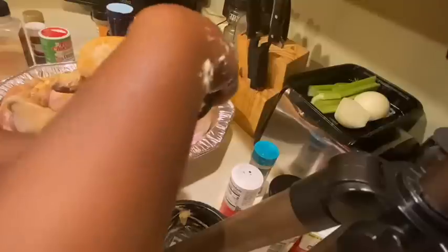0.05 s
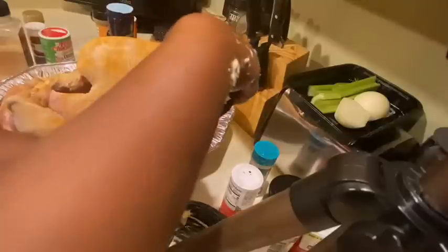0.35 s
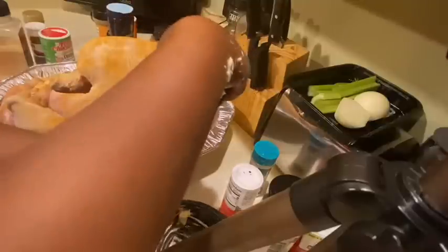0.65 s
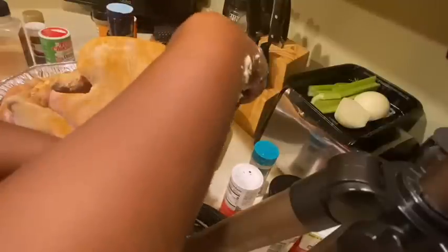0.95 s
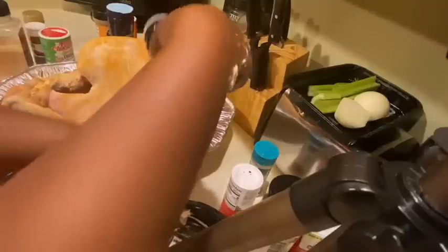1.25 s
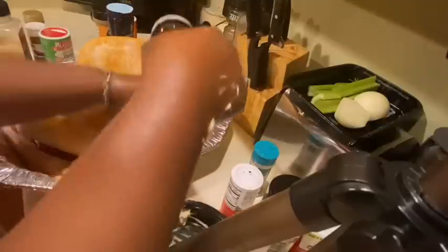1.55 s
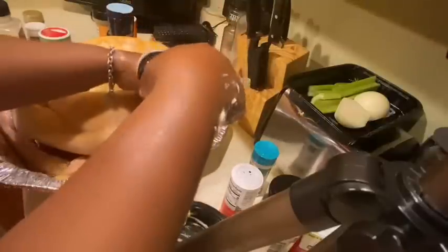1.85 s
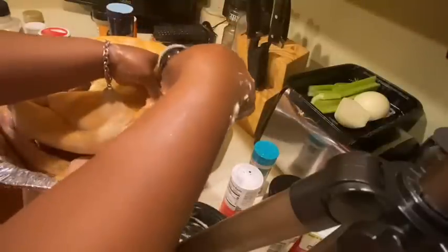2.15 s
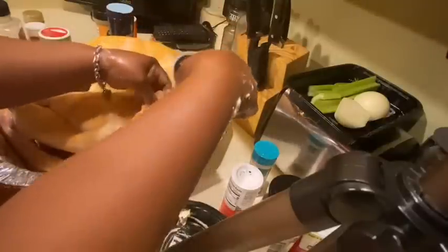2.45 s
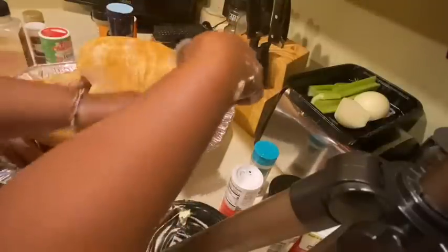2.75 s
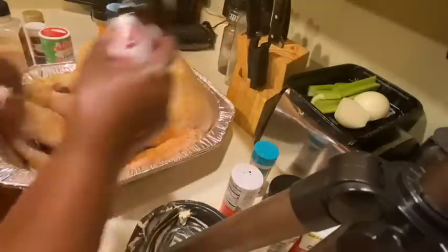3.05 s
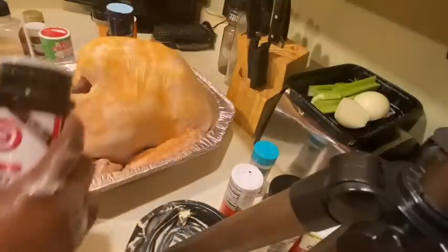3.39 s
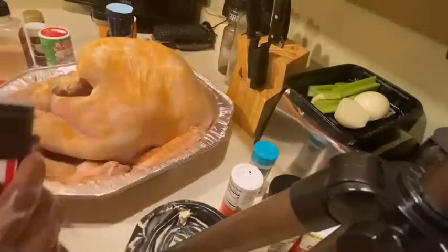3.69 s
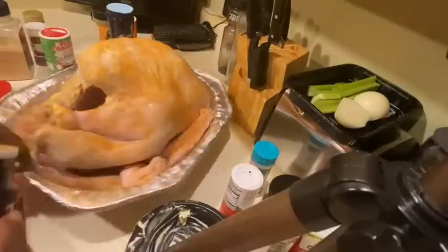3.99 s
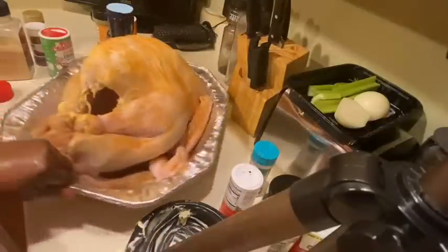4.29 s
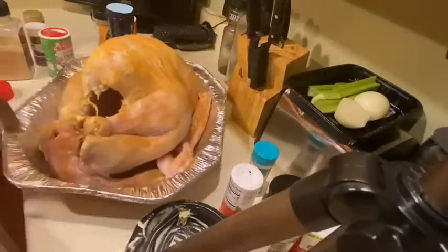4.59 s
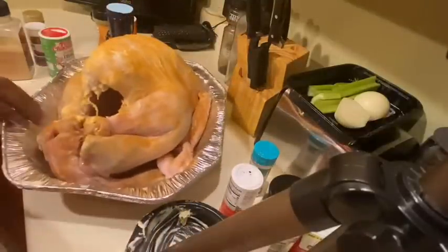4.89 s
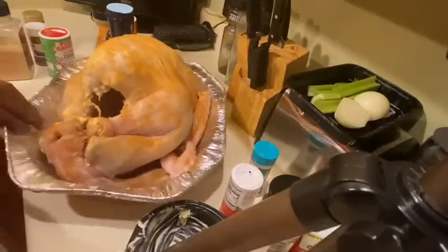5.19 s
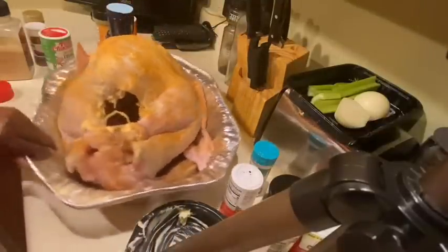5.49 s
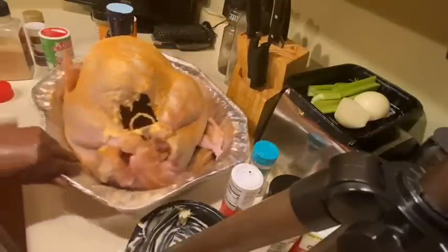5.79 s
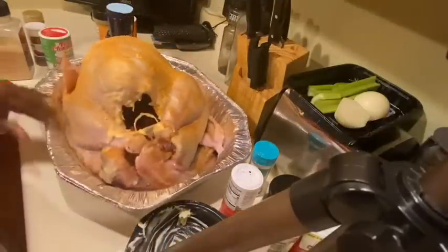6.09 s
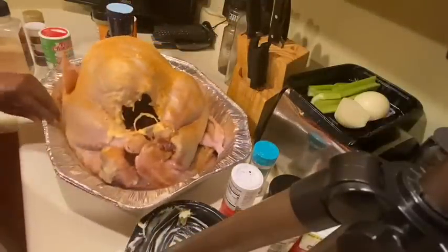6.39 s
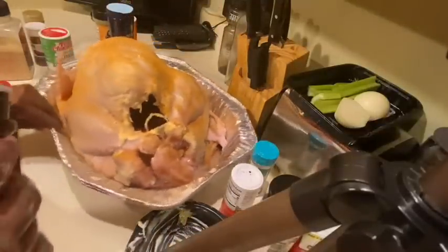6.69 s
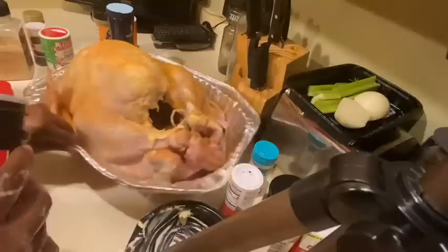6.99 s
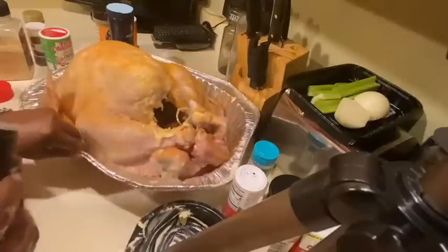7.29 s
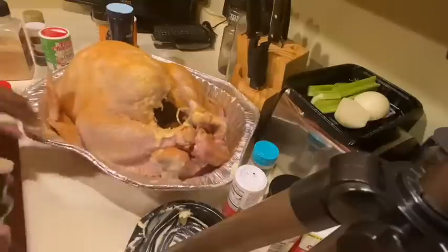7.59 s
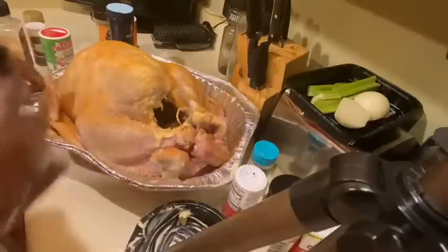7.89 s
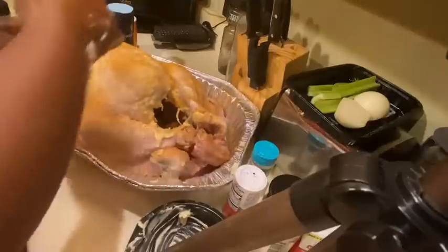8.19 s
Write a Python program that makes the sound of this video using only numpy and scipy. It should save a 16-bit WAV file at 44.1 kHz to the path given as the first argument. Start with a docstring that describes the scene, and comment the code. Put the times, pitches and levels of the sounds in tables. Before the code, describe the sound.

An appliance drones quietly to the right in a small kitchen. Close by, something clinks, and hands smear butter over a raw turkey with faint, moist, clicking strokes. Next the loaded foil pan is dragged round in short pushes: its thin base pops loudly as it buckles, scrapes and crinkles, then knocks on the worktop. The drone sinks for a moment at the end.

```python
"""A light bump and a clink, then buttery hands rub a raw turkey in a foil pan with a wet hiss.
The hiss is countless tiny clicks of tearing butter. Next the pan is turned round on the kitchen
counter: its thin base scrapes as it catches and slips, pops as it buckles and crinkles as creases
give way, and the loaded pan bumps the worktop. All along, an appliance hums to the right in the
small room; its drone sinks briefly near the end."""
import sys
import numpy as np
from scipy import signal
from scipy.fft import rfft, irfft
from scipy.io import wavfile

SR = 44100
rng = np.random.default_rng(int(sys.argv[2]) if len(sys.argv) > 2 else 0)


def output_pcm(signal):
    """Save a mono or channel-first signal as 16-bit PCM at the path in sys.argv[1].

    Samples are clipped to [-1, 1] before scaling.
    """
    pcm = np.clip(np.atleast_2d(signal).T, -1, 1) * 32767
    wavfile.write(sys.argv[1], SR, np.round(pcm).astype(np.int16))


N = 372644
T = np.arange(N) / SR

# Levels in the tables are relative: the functions turn them up or down. Hz tells the pitch.
# The tone of each noise, from bass to treble. Each row: frequency in Hz, level in dB.
AIR_TONE = [(100, -26), (900, 6.5), (1600, -3.5), (3000, -17.5), (6000, -21), (15000, -25.5)]
FAN_TONE = [(22, -46.5), (32, -21.5), (42, -5.5), (56, -0.5), (76, -5), (100, -2.5), (155, 1.5), (200, -7),
            (330, -5), (540, -10), (750, -25.5), (1050, -21.5), (1700, -43), (3300, -58.5)]
RIM_TONE = [(1500, -33), (2700, -19), (3300, 4), (3700, -5), (4600, -6.5), (9000, -7.5)]
THUMP_TONE = [(90, 1), (200, -0.5), (330, 8.5), (450, -6.5), (600, -7), (800, 2.5), (2000, -46)]
SNAP_TONE = [(800, -9), (1700, 8), (2400, 7.5), (3100, 4.5), (3800, 4), (5200, -2.5), (9000, -10.5),
             (16000, -10)]
SCRAPE_TONE = [(200, -3.5), (330, 3), (520, -1), (650, 0.5), (1000, 6.5), (1500, 3), (2050, 3), (2650, 5),
               (3100, -1.5), (3800, -2), (5500, -0.5), (8000, -9), (15000, -40)]
HISS_TONE = [(2500, -36.5), (5000, 8.5), (7000, 5), (9000, 6), (11000, 12), (13200, 3), (15000, 5.5)]
SKIN_TONE = [(900, -11.5), (1700, -10.5), (2400, -3.5), (3100, -11), (4500, -4), (6000, -1.5), (8000, -6),
             (11500, 1.5), (15500, -5)]
# Modes are the pitches a thing rings at; narrow ones ring longer.
# Each row: pitch in Hz, width in Hz, level in dB.
FOIL_MODES = [(345, 40, 9), (550, 41, -7.5), (740, 45, -4), (884, 35, 6), (949, 61, 11.5), (1160, 55, 8),
              (1297, 66, 7), (1426, 32, -6), (1785, 23, 6.5), (2270, 40, 5), (2440, 40, -11),
              (2710, 40, -13), (3040, 30, -8), (3740, 130, -3.5)]  # the foil base
RIB_MODES = [(2320, 380, -3.5), (3650, 230, 8.5)]  # the ribs in the base
BUMP_MODES = [(340, 88, 0.5), (600, 150, 3), (836, 120, 13), (1047, 66, 4), (1260, 86, 5), (1570, 95, -3),
              (2190, 110, -7), (3520, 130, -21)]  # the loaded pan on the worktop
CLINK_MODES = [(2210, 60, 0), (2480, 77, 7), (2794, 28, 2.5), (3700, 170, 1), (5720, 400, 3),
               (6400, 280, -4)]  # something small and hard
LINGER_MODES = [(2680, 580, 0)]  # a faint, narrow hiss
# The appliance's steady tones. Each row: pitch in Hz, level in dB.
HUM_TONES = [(58.4, -64.5), (94, -65), (120, -52.5)]
# Something small clinks by the hand. Each row: start in seconds, level in dB.
CLINKS = [(0.074, -59), (0.106, -49), (0.132, -59)]
# Fingers rasp on the rim. Each row: loudest moment in seconds, fade time in seconds, level in dB.
RASPS = [(3.343, 0.024, -60), (5.137, 0.1, -57), (5.788, 0.02, -51.5), (6.058, 0.027, -62.5),
         (6.202, 0.033, -49)]
# Wet skin lets out air. Each row: start in seconds, level in dB, pitch in Hz.
SQUELCHES = [(1.228, -62, 1010), (1.238, -62, 1660), (2.508, -53, 670), (2.528, -52.5, 1230)]
# Sticky skin lets go of a finger. Each row: start in seconds, level in dB.
SKIN_CLICKS = [(0.584, -56.5), (0.785, -65.5), (0.916, -55), (0.949, -46), (1.163, -61), (1.318, -52.5),
               (1.472, -55), (1.492, -52), (1.533, -54), (1.545, -47), (1.781, -51.5), (1.896, -49),
               (2.039, -47), (2.049, -43), (2.157, -47), (2.228, -50), (2.545, -54), (2.563, -42.5)]
# Foil creases give way. Each row: start in seconds, tick, snap and ping levels in dB, ping pitch in Hz.
CREASES = [(0.072, -49, -51, -45, 3920), (0.1084, -47, -48, -49, 4600), (3.776, -35, -53, -35.5, 3870),
           (3.862, -40, -60, -60, 6000), (4.511, -54.5, -73, -76, 5940), (4.701, -61, -61, -66, 2500),
           (4.946, -49, -61, -52.5, 1390), (5.028, -46, -66, -66, 5000), (5.772, -59, -65, -64, 4000),
           (6.084, -70, -57, -58, 3200), (6.332, -50.5, -52, -50.5, 5400), (6.416, -52, -61, -68, 4000),
           (6.468, -46, -50, -56, 3520), (6.5679, -32, -44, -43.5, 1980), (6.895, -30.5, -38, -45, 4150),
           (6.931, -37, -45.5, -37, 3500), (7.184, -46, -53, -47, 3560), (7.2696, -54, -61, -54, 5500),
           (7.7673, -60, -57, -61, 2630), (7.856, -75, -51.5, -54, 2190)]
# Low thuds: a hollow knock at the start, then the bird settling.
# Each row: start in seconds, level in dB, pitch in Hz.
THUDS = [(0.079, -41, 270), (2.719, -34, 56), (2.808, -34, 56.6), (2.845, -38, 54), (6.913, -30, 135),
         (6.948, -37, 190), (6.983, -29.5, 171), (7.002, -27.5, 99), (7.01, -37, 50)]
# The pan bumps the counter. Each row: start in seconds, knock, body and snap levels in dB,
# fade time in seconds, a number that multiplies the pitch of the knock.
BUMPS = [(0.0709, -52, -56, -51.5, 0.052, 1.05), (0.229, -49, -57, -59.5, 0.012, 1.08),
         (2.7, -54.5, -67, -58, 0.026, 1.2), (2.7997, -39.5, -47, -50.5, 0.009, .6),
         (3.1, -57.5, -68, -79, 0.008, 1.4), (3.235, -55, -65.5, -74, 0.0083, 1.25),
         (6.8955, -42, -54, -67, 0.008, .9), (6.907, -36, -39.5, -57, 0.0099, .97),
         (6.933, -34.5, -52, -69, 0.009, 1.1), (6.963, -41.5, -39, -76, 0.018, .95),
         (6.986, -50.5, -46, -66, 0.016, .95), (7.013, -51, -60, -72, 0.011, 1.2),
         (7.037, -52, -68, -72, 0.0036, 1.05), (7.186, -40, -50.5, -72, 0.01, 1),
         (7.231, -46.5, -54, -73, 0.0074, 1.05)]
# The base buckles. Each row: start in seconds, flip, ring and snap levels in dB,
# fade time in seconds, main pitch in Hz.
POPS = [(3.774, -24.5, -30.5, -45, 0.0024, 2650), (3.7808, -19.5, -31.5, -51, 0.0024, 1330),
        (3.7874, -17.5, -34, -58, 0.0022, 1360), (3.908, -49, -43, -63, 0.005, 1200),
        (3.953, -26, -42.5, -46, 0.0043, 1170), (3.9582, -22, -36, -57, 0.0038, 1220),
        (4.051, -28, -40, -64, 0.0047, 1040), (4.058, -26, -42.5, -64, 0.0023, 1200),
        (4.0626, -29, -40, -65, 0.0041, 1140), (4.088, -29, -46, -74, 0.0059, 1120),
        (4.198, -34, -44, -68, 0.015, 1180), (4.302, -43, -50, -66, 0.0039, 1900)]
# A panel of the base sings. Each row: start and length in seconds, level in dB, pitch in Hz.
PANELS = [(3.28, 0.097, -58, 2280), (3.505, 0.44, -59.5, 830), (4.663, 0.15, -63, 830),
          (5.012, 0.061, -64, 860), (5.1, 0.19, -68, 3750), (5.58, 0.074, -56, 1730),
          (6.53, 0.3, -69, 2380)]
# Pushes drag the pan. Each row: start, length and time to gather speed in seconds,
# scrape level in dB, hiss level in dB compared with the scrape.
PUSHES = [(2.646, 0.18, 0.046, -59, 1), (2.853, 0.24, 0.026, -70, -8.5), (3.081, 0.082, 0.018, -64.5, -4),
          (3.179, 0.22, 0.17, -58.5, -7), (3.44, 0.8, 0.24, -50, -2.5), (4.208, 0.14, 0.087, -61.5, -3.5),
          (4.691, 0.12, 0.0073, -58, -2.5), (4.859, 0.035, 0.018, -66.5, -3),
          (4.984, 0.28, 0.14, -55.5, 0.5), (5.252, .28, .03, -58.5, -2.5), (5.518, 0.19, 0.064, -55.5, -1),
          (5.726, 0.076, 0.052, -60, 1.5), (5.991, 0.096, 0.0055, -63, -6), (6.139, 0.1, 0.04, -58.5, -7),
          (6.254, 0.22, .02, -69, -10), (6.407, 0.47, 0.19, -53, -0.5), (6.878, 0.11, 0.008, -54.5, -13),
          (7.033, 0.13, .02, -78.5, -6), (7.24, 0.12, 0.13, -58.5, -4), (7.758, 0.094, 0.018, -65, -4.5),
          (7.903, 0.2, 0.025, -84, -14)]
# A hand strokes the buttered skin. Each row: start and length in seconds, level in dB.
STROKES = [(0.332, 0.044, -57.5), (0.464, 0.021, -71), (0.589, 0.031, -69), (0.79, 0.16, -80),
           (0.893, 0.062, -55.5), (0.98, 0.22, -69), (1.195, 0.059, -64.5), (1.332, 0.15, -77.5),
           (1.475, 0.087, -59), (1.565, 0.13, -65.5), (1.785, 0.1, -66), (1.887, 0.21, -57),
           (2.118, 0.084, -60.5), (2.243, 0.076, -56), (2.325, 0.22, -62.5), (2.552, 0.19, -55.5)]

SIDE_LEAD, PAN_LEAD = 12, 7  # samples by which a sound reaches the nearer side first


def undb(db):
    """Turn decibels into a number to multiply a sound by."""
    return 10 ** (np.asarray(db) / 20)


def unit(x):
    """Scale a sound so that its average power is 1."""
    return x / np.sqrt(np.mean(x ** 2) + 1e-20)


def add(track, start_s, sound):
    """Mix a sound into a track at the given time."""
    start = max(int(start_s * SR), 0)
    track[start:start + len(sound)] += sound[:N - start]


def colour(x, tone):
    """Shape a sound's bass and treble with a tone table; the result has power 1."""
    hz, db = np.transpose(tone)
    size = 8192
    log_hz = np.log(np.fft.rfftfreq(size, 1 / SR) + 1)
    log_gain = np.log(undb(np.interp(log_hz, np.log(hz), db)))
    # these steps build a filter that never answers before the sound arrives
    cepstrum = irfft(log_gain)[:size // 2]
    cepstrum[1:] *= 2
    response = irfft(np.exp(rfft(cepstrum, size)))[:size // 2]
    return unit(signal.oaconvolve(x, response)[:len(x)])


def ring(force, modes, pitch=1):
    """A force makes an object ring at its modes; the result has power 1."""
    out = 0
    for hz, width_hz, db in modes:
        resonator = signal.iirpeak(hz * pitch, hz / width_hz, fs=SR)
        out = out + undb(db) * unit(signal.lfilter(*resonator, force))
    return unit(out)


def wander(turns_per_s):
    """A random curve that drifts mostly between -1 and 1."""
    points = rng.standard_normal(int(T[-1] * turns_per_s) + 2)
    return np.interp(T * turns_per_s, np.arange(len(points)), points)


def tiny_slips(per_s, spread_db=0):
    """A dense stream of tiny clicks; more spread makes their sizes more unequal."""
    slips = np.zeros(N)
    at = np.flatnonzero(rng.random(N) < per_s / SR)
    slips[at] = rng.standard_normal(len(at))
    slips[at] *= undb(spread_db * np.minimum(rng.exponential(size=len(at)), 4))
    return unit(slips)


def chatter(fade_s, rise_s=0.0001, uneven_db=4):
    """One contact: a quickly dying flurry of tiny, uneven impacts."""
    t = T[:SR // 5]
    impacts = rng.standard_normal(len(t)) * undb(uneven_db * rng.standard_normal(len(t)))
    return impacts * np.exp(-t / fade_s) * (1 - np.exp(-t / rise_s))


def gesture(start_s, length_s, rise_s, fade_s, sag_db_per_s):
    """The strength of one movement: it builds, eases off slowly, then dies away."""
    out, t = np.zeros(N), T[T < length_s + 10 * fade_s]
    rise = np.minimum(t / rise_s, 1)
    fade = np.exp(-np.maximum(t - length_s, 0) / fade_s)
    add(out, start_s, rise * undb(-sag_db_per_s * t) * fade)
    return out


def load_shares(count, turns_per_s=7, spread_db=5):
    """Weight shifts between touching spots; their powers always add up to 1."""
    load = np.array([undb(spread_db * wander(turns_per_s)) for _ in range(count)])
    return load / np.sqrt(np.sum(load ** 2, axis=0))


def kitchen(x, near_s=0.013, left_db=0.24, walls_db=5.5, room_db=-3.5, lead=-SIDE_LEAD):
    """Stereo sound with echoes from worktop and wall, then the room. A positive lead means left first."""
    t, out = T[:SR // 3], []
    echo_s = 0.39  # time for the room's echo to fall by 60 dB
    shared = 0.39 * rng.standard_normal(len(t))  # the part of the near echoes both sides hear
    for lag, side in ((max(-lead, 0), .5), (max(lead, 0), -.5)):
        near = unit((shared + rng.standard_normal(len(t))) * np.exp(-t / near_s))
        tail_shape = undb(-60 * t / echo_s) * (1 - np.exp(-t / 0.0036))
        tail = unit(rng.standard_normal(len(t)) * tail_shape)
        response = (undb(walls_db) * near + undb(room_db) * tail) / np.sqrt(len(t))
        response[0] += 1  # the direct sound
        out.append(undb(side * left_db) * signal.oaconvolve(x, np.roll(response, lag))[:N])
    return np.array(out)


def room_air(level_db=-68.5):
    """A faint, even hiss from all around."""
    return undb(level_db) * np.array([colour(rng.standard_normal(N), AIR_TONE) for _ in range(2)])


def drone_level(return_s, dip_at_s=7.6, dip_db=-10.5, fall_s=0.079, hold_s=0.32):
    """The drone swells at the start; near the end it drops, stays low and starts to come back."""
    swell_db = 1.5 - 5.5 * np.exp(-T / 0.17)
    fall = np.clip((T - dip_at_s) / fall_s, 0, 1)
    back = np.clip((T - dip_at_s - fall_s - hold_s) / return_s, 0, 1)
    return undb(swell_db + dip_db * fall * (1 - back))


def appliance(fan_db=-56.5, hum_left_db=-7, fan_left_db=-4, waver_db=0.5, flicker_db=1.85):
    """Mains hum and motor tones over a low rush of air, all weaker on the left."""
    sides = np.array([[.5], [-.5]])  # left, right
    hum_time = T + 0.000538 * sides  # the two sides are slightly out of step
    hum = 0
    for hz, db in HUM_TONES:
        strength = np.sqrt(2) * undb(db + waver_db * wander(9.6))
        hum = hum + strength * np.sin(2 * np.pi * (hz * hum_time + rng.random()))
    middle, spread = (colour(rng.standard_normal(N), FAN_TONE) for _ in range(2))
    rush = np.array([middle, np.roll(middle, 21)]) + 1.12 * sides * spread
    rush *= undb(fan_db + flicker_db * wander(6.5))
    hum *= drone_level(return_s=0.22) * undb(hum_left_db * sides)
    rush *= drone_level(return_s=1) * undb(fan_left_db * sides)
    return hum + rush


def clinking(gain_db=-9, contact_s=0.0074):
    """Something small and hard gives a short, bright rattle."""
    out = np.zeros(N)
    for start, db in CLINKS:
        add(out, start, undb(db + gain_db) * ring(chatter(contact_s), CLINK_MODES))
    return out


def lingering_hiss(level_db=-66.5):
    """A faint, narrow hiss near 2.7 kHz lingers briefly and fades."""
    strength = gesture(start_s=4.34, length_s=0.26, rise_s=0.053, fade_s=0.05, sag_db_per_s=32)
    hiss = ring(rng.standard_normal(N), LINGER_MODES)
    return undb(level_db) * strength * ring(hiss, LINGER_MODES)  # ringing twice narrows it


def rim_rasping():
    """Fingers slip over the fine pleats of the rim."""
    grip = sum(undb(db) * np.exp(-((T - peak_s) / fade_s) ** 2) for peak_s, fade_s, db in RASPS)
    return grip * colour(tiny_slips(per_s=2500, spread_db=2), RIM_TONE)


def squelching(gain_db=-14, burst_s=0.0037, width_hz=420):
    """A burst of air rings a small, soft pocket in the wet skin."""
    out = np.zeros(N)
    for start, db, hz in SQUELCHES:
        pocket = [(hz, width_hz, 0)]
        add(out, start, undb(db + gain_db) * ring(ring(chatter(burst_s), pocket), pocket))
    return out


def skin_clicking(gain_db=-19):
    """Sticky skin clicks softly as it parts from a finger."""
    out = np.zeros(N)
    for start, db in SKIN_CLICKS:
        click = colour(chatter(fade_s=0.0077, rise_s=0.00044), SKIN_TONE)
        add(out, start, undb(db + gain_db) * click)
    return out


def foil_crinkling(ping_width_hz=400):
    """The foil ticks brightly as a crease gives way with a snap and a ping."""
    out = np.zeros(N)
    for start, tick_db, snap_db, ping_db, hz in CREASES:
        tick = undb(tick_db - 19) * colour(chatter(fade_s=0.00081), HISS_TONE)
        snap = undb(snap_db - 18) * colour(chatter(fade_s=0.0043), SNAP_TONE)
        ping = undb(ping_db - 19) * ring(chatter(fade_s=0.0025), [(hz, ping_width_hz, 0)])
        add(out, start, tick + snap + ping)
    return out


def low_thuds(gain_db=-1, swell_s=0.011, phase_gap_rad=1.92):
    """A hollow knock, later the bird settling: a few slow swings each, out of step left and right."""
    out, t = np.zeros((2, N)), T[:SR // 5]
    swell = t / swell_s * np.exp(1 - t / swell_s)
    for start, db, hz in THUDS:
        for track, side in zip(out, (.5, -.5)):
            swing = np.sin(2 * np.pi * hz * t + side * phase_gap_rad)
            add(track, start, undb(db + gain_db) * swell * swing)
    return out


def pan_bumping():
    """The pan knocks on the worktop, with a dull body below and a snap of foil on top."""
    out = np.zeros(N)
    for start, knock_db, body_db, snap_db, fade_s, pitch in BUMPS:
        knock = undb(knock_db - 9) * ring(chatter(fade_s), BUMP_MODES, pitch)
        body = undb(body_db - 9.5) * colour(chatter(fade_s=0.018), THUMP_TONE)
        snap = undb(snap_db - 4) * colour(chatter(fade_s), SNAP_TONE)
        add(out, start, knock + body + snap)
    return out


def base_popping(flip_s=0.0011, firm_db=-46, band_hz=(250, 5000)):
    """The base flips, snaps and rings, a small buckle higher than a wide one; then the sheet rattles."""
    out, t = np.zeros(N), T[:SR // 20]
    flip_shape = t / flip_s * np.exp(1 - t / flip_s)
    for start, flip_db, ring_db, snap_db, fade_s, hz in POPS:
        rise_s = 0.00044 * 4.0 ** (firm_db - ring_db)  # harder pops build up sooner
        ringing = undb(-7) * ring(chatter(fade_s, rise_s), FOIL_MODES)
        rattle = undb(-20) * ring(chatter(fade_s=0.085), FOIL_MODES)
        buckle = signal.iirpeak(hz, Q=0.76, fs=SR)  # favours the modes near this pop's pitch
        add(out, start, undb(flip_db) * flip_shape * np.sin(2 * np.pi * hz * t))
        add(out, start, undb(ring_db) * signal.lfilter(*buckle, ringing + rattle))
        add(out, start, undb(snap_db - 8) * colour(chatter(fade_s, rise_s), SNAP_TONE))
    # a thin sheet gives off little bass, and the wet bird muffles its treble
    return signal.sosfilt(signal.butter(2, band_hz, "band", fs=SR, output="sos"), out)


def panel_singing(sharpness=8):
    """Slips on the counter keep one panel of the base ringing hollowly."""
    slips = tiny_slips(per_s=1500, spread_db=2)
    out = np.zeros(N)
    for start, length, db, hz in PANELS:
        strength = gesture(start, length, rise_s=0.029, fade_s=0.022, sag_db_per_s=5)
        out += undb(db) * strength * ring(slips, [(hz, hz / sharpness, 0)])
    return out


def flexing(ringing, pitch_share=0.09, turns_per_s=8):
    """The sheet flexes as it slides, so the pitch of its ringing wanders."""
    clock = np.cumsum(1 + pitch_share * wander(turns_per_s)) / SR
    return np.interp(clock % T[-1], T, ringing)


def pan_sliding(judder_db=1.36, foil_db=-14, rib_db=-9, pitch_spread=0.064, spots=3):
    """The ribbed base catches at spots left and right; each rings the foil at its own pitch."""
    judder = undb(judder_db * wander(60))
    scrape_level = hiss_level = out = 0
    for start, length, rise_s, db, hiss_db in PUSHES:
        # once moving, the pan drags a little more easily; it stops quickly when let go
        drag = judder * gesture(start, length, rise_s, fade_s=0.018, sag_db_per_s=6.5)
        scrape_level += undb(db - 1) * drag
        hiss_level += undb(db + hiss_db + 0.5) * drag
    pitches = np.exp(pitch_spread * np.linspace(-1, 1, spots))
    for spot, (share, pitch) in enumerate(zip(load_shares(spots), pitches)):
        slips = tiny_slips(per_s=1300, spread_db=1.94)
        foil = undb(foil_db) * ring(slips, FOIL_MODES, pitch)
        ribs = undb(rib_db) * ring(slips, RIB_MODES)
        scrape = scrape_level * (colour(slips, SCRAPE_TONE) + flexing(foil + ribs))
        hiss = hiss_level * colour(tiny_slips(per_s=1300, spread_db=1.94), HISS_TONE)
        out += kitchen(share * (scrape + hiss), lead=(-1) ** spot * SIDE_LEAD)
    return out


def hands_rubbing(film_db=-2.05, grip_db=1, crackle_db=-7, fingers=3):
    """A film of butter tears in countless tiny wet clicks under each finger; a few stand out."""
    strokes = film = 0
    for start, length, db in STROKES:
        # the hand lands, eases off as it glides, and lifts
        strokes += undb(db) * gesture(start, length, rise_s=0.026, fade_s=0.018, sag_db_per_s=22.5)
    pressure = strokes * undb(film_db + grip_db * wander(35))  # the grip comes and goes
    for share in load_shares(fingers):
        film += kitchen(pressure * share * colour(tiny_slips(per_s=1100), SKIN_TONE))
    crackle = undb(crackle_db) * strokes * colour(tiny_slips(per_s=110), SKIN_TONE)
    return film + kitchen(crackle, near_s=0.0039, walls_db=6)


def scene():
    """Each place on the counter has its own echoes; the pan lies to the left, close to the worktop."""
    pops = kitchen(base_popping(), near_s=0.0088, left_db=1.5, walls_db=-1.5, room_db=-9, lead=PAN_LEAD)
    pan_body = pan_bumping() + panel_singing()
    knocks = kitchen(pan_body, near_s=0.0058, walls_db=-2.5, room_db=-8, lead=PAN_LEAD)
    rasps = rim_rasping() + lingering_hiss()
    clicks = skin_clicking() + foil_crinkling() + squelching()
    touches = sum(kitchen(sound, near_s=0.008, walls_db=1.5) for sound in (rasps, clicks, clinking()))
    handling = pops + knocks + touches + hands_rubbing() + pan_sliding() + low_thuds()
    return handling + appliance() + room_air()


def record(dry, low_cut_hz=36, high_cut_hz=16000):
    """Cut away the deepest bass and the highest treble."""
    thinned = signal.sosfilt(signal.butter(4, low_cut_hz, "high", fs=SR, output="sos"), dry)
    return signal.sosfilt(signal.ellip(10, .2, 70, high_cut_hz, fs=SR, output="sos"), thinned)


dry = scene()
out = record(dry)
output_pcm(out)
```